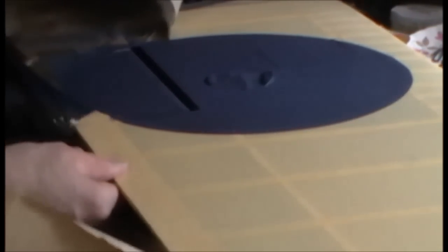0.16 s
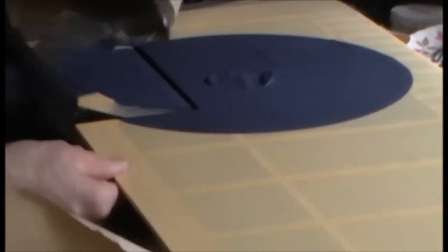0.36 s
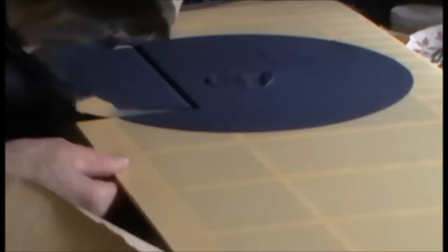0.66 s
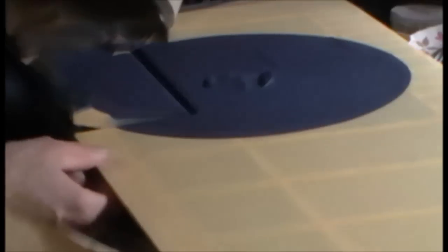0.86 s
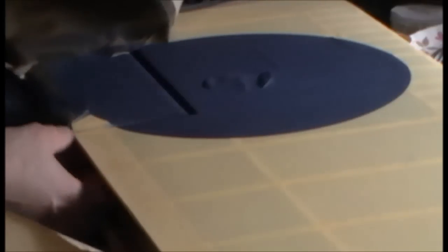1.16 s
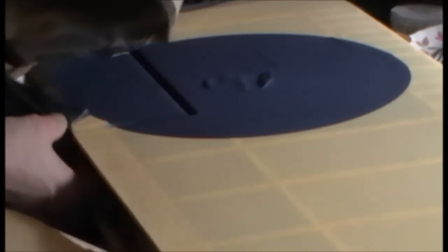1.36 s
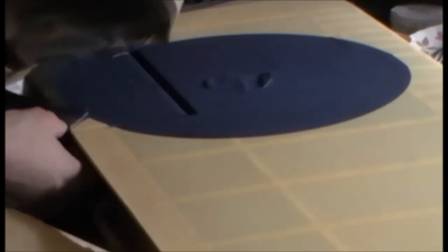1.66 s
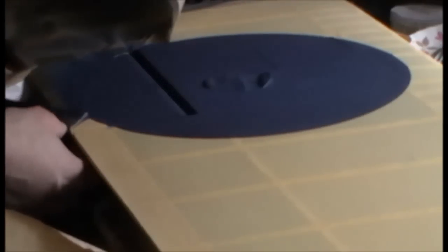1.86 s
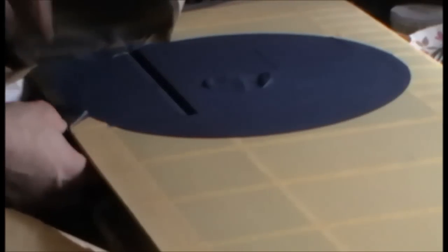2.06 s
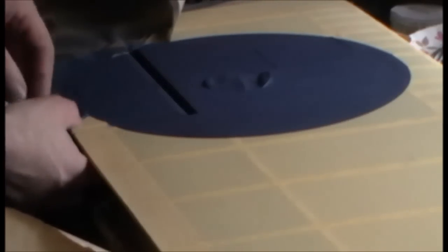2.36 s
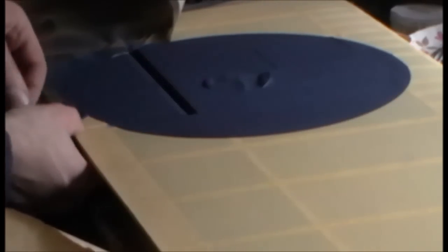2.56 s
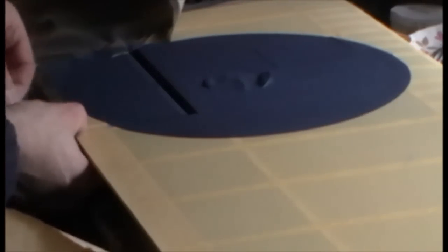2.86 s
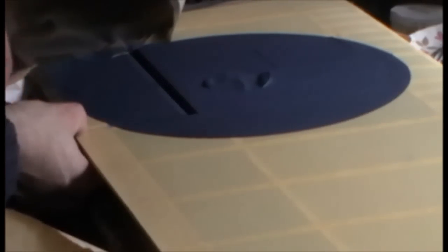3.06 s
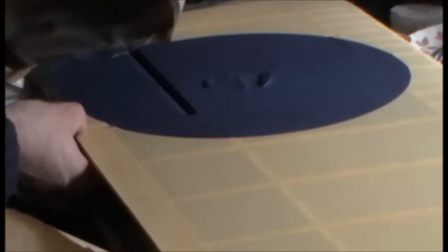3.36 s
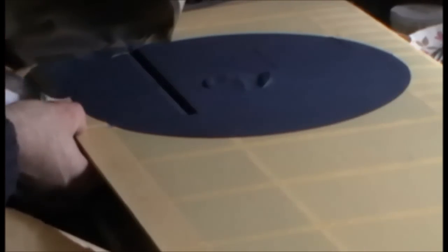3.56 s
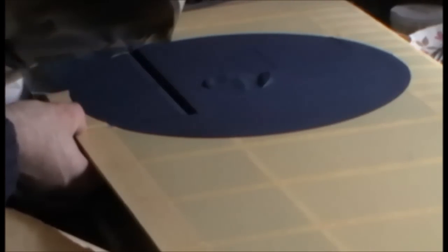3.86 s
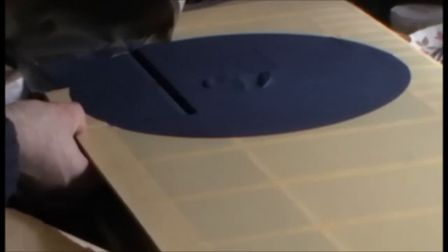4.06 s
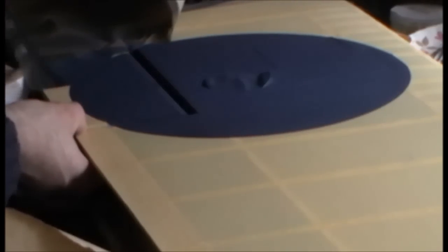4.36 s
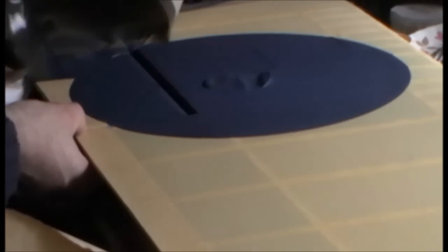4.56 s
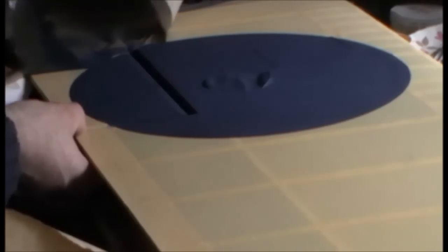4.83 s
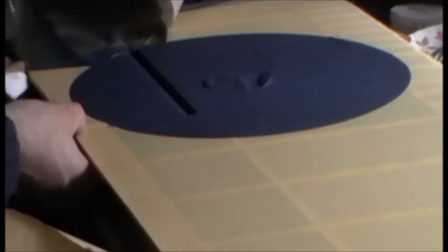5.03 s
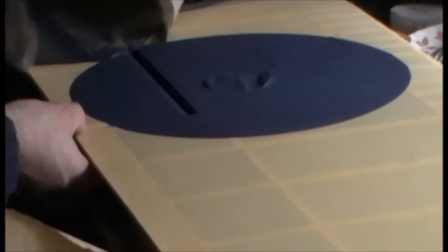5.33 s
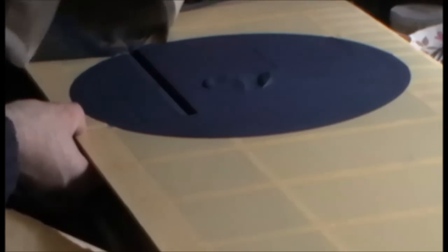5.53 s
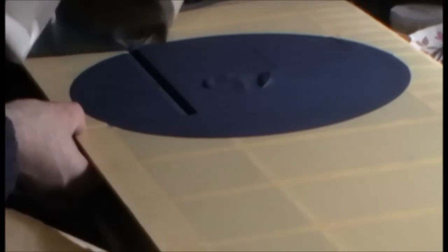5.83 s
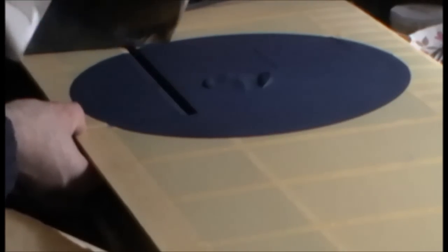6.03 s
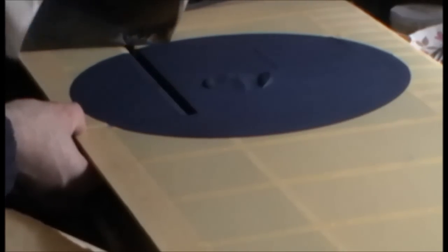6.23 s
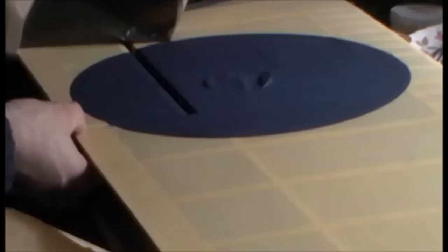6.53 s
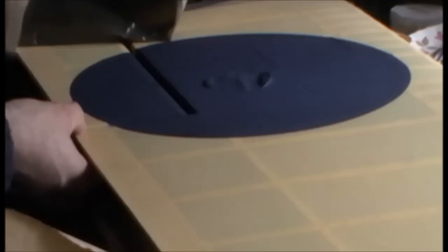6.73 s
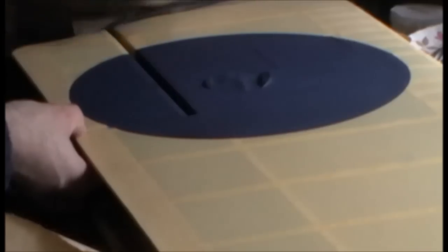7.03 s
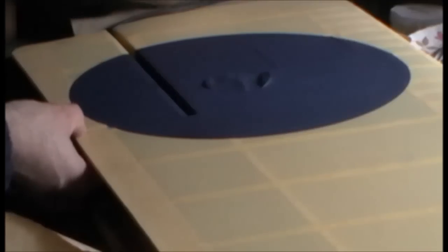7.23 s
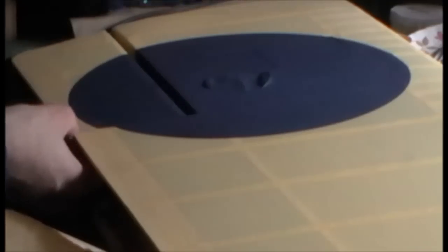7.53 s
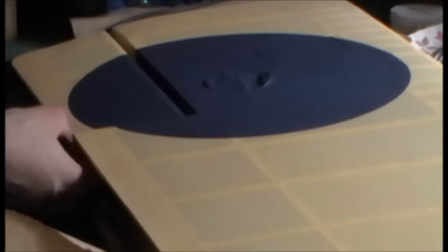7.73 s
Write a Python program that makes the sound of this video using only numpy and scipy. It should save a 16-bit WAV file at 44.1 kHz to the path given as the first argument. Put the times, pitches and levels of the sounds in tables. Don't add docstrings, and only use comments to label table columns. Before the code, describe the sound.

Close stereo pickup of sticky film coming off a stretched-skin wing: grainy rustle, brittle ticks, short ripping bursts and muted drumming of the frame. It starts busy, goes nearly quiet, returns in stronger pulls, and peaks near the end as the last strip tears free with a loud snap and low thump, then rustles out. Faint hum, hiss and distant traffic sit beneath.

```python
import sys
import numpy as np
from scipy import signal
from scipy.fft import rfft, irfft
from scipy.io import wavfile

SR = 44100
rng = np.random.default_rng(int(sys.argv[2]) if len(sys.argv) > 2 else 0)


def ratio_of_db(decibels):
    return 10 ** (np.asarray(decibels, float) / 20)


def unload_audio(sound):
    columns = np.transpose(np.atleast_2d(sound))
    steps = np.round(np.clip(columns, -1, 1) * 32767)
    wavfile.write(sys.argv[1], SR, steps.astype(np.int16))


N = 347949

# (frequency [Hz], level [dB per Hz])
FILM_COLOUR = [(410, -56), (700, 1), (830, -11), (1600, 1.5), (1970, 1.5), (2630, 0.5), (3890, 1.5),
               (4860, -0.5), (7010, -2), (16000, -35.5)]
# (frequency [Hz], width [Hz], level [dB])
SINGING_BAYS = [(1258, 240, -3.5), (2030, 99, -15.5), (2550, 230, -2.5), (3140, 320, -9.5),
                (4174, 120, -1.5), (5300, 230, -3)]


def at_hz(points, hz):
    points_hz, level_db = np.transpose(points)
    return np.interp(np.log(hz), np.log(points_hz), level_db)


def in_time(rows):
    s, *columns = np.transpose(rows)
    return [np.interp(np.arange(N) / SR, s, c) for c in columns]


def rms_one(x):
    return x / np.sqrt(np.mean(x ** 2) + 1e-20)


def drift(rate):
    steps = int(N / SR * rate * 2) + 2
    return np.interp(np.linspace(0, steps - 1, N), np.arange(steps), rng.standard_normal(steps)) * 1.2


def shaped(x, spectrum):
    hz = np.linspace(0, SR / 2, 257)
    taps = signal.firwin2(511, hz, ratio_of_db(2 * at_hz(spectrum, hz + 1)), fs=SR)
    return signal.fftconvolve(x, signal.minimum_phase(taps))[:len(x)]


def band(x, low_hz, high_hz, order=1):
    edges = [low_hz, min(high_hz, SR / 2.2)]
    return signal.sosfilt(signal.butter(order, edges, "band", fs=SR, output="sos"), x)


def steep(x, low_hz, high_hz):
    return band(x, low_hz, high_hz, order=2)


def hiss():
    # (frequency [Hz], level [dB per Hz])
    noise_colour = [(15, -62), (25, -17.5), (92, -5), (182, -10), (232, -13), (296, -10.5), (687, -11.5),
                    (952, -12.5), (1680, -20), (1980, -15), (2210, -19), (2400, -19.5), (2750, -25.5),
                    (15200, -38), (16500, -39)]
    # (frequency [Hz], likeness [0-1])
    likeness = [(60, 1), (180, 0.58), (550, 0.49), (1650, 0.36), (4970, 0.12), (15000, 0.79)]
    hz = np.fft.rfftfreq(N, 1 / SR) + 1
    alike = np.clip(at_hz(likeness, hz), 0, 1)
    mid, side = rfft(rng.standard_normal((2, N))) * ratio_of_db(at_hz(noise_colour, hz))
    mid, side = mid * np.sqrt(1 + alike), side * np.sqrt(1 - alike)
    return ratio_of_db(-56) * rms_one(irfft(np.array([mid + side, mid - side]), N))


def drones():
    # (time [s], pitch [Hz], level [dB])
    engines = [
        [(0.0, 70.8, -69), (1.26, 76.9, -74.5), (1.4, 93.6, -83), (1.93, 82, -71.5), (2.81, 90.0, -69.5),
         (3.37, 70.1, -73), (3.6, 78, -91)],
        [(3.6, 54.2, -78), (4.14, 49.3, -78), (4.48, 53.3, -63.5), (6.26, 53.5, -83), (7.55, 61.7, -80),
         (7.69, 49.2, -72), (7.89, 51.7, -90)],
    ]
    hum_hz, hum_db = 100, -80
    t = np.arange(N) / SR
    out = ratio_of_db(hum_db + 0.99 * drift(4)) * np.sin(2 * np.pi * hum_hz * t)
    for rows in engines:
        hz, level_db = in_time(rows)
        start, end = rows[0][0], rows[-1][0]
        heard = np.interp(t, [start - .2, start, end, end + 0.23], [0, 1, 1, 0])
        phase = 2 * np.pi * np.cumsum(hz + 1.95 * drift(2.6)) / SR
        out += heard * ratio_of_db(level_db + 10.5 + 1.2 * drift(10)) * np.sin(phase)
    return out


def slips(count, per_s, spread_db):
    chance, size, side = rng.random((3, count))
    return (chance < per_s / SR) * ratio_of_db(-spread_db * np.log(size + 0.03)) * np.sign(side - .5)


def wing(push, longest_s, scatter_db):
    # (frequency [Hz], level [dB], decay t60 [s])
    modes = [(366, -10.5, 0.06), (449, -10.5, 0.19), (564, -19.5, 0.15), (621, -15.5, 0.22), (699, -4, 0.1),
             (736, -12.5, 0.077), (788, -15.5, 0.24), (870, -19.5, 0.17), (936, -20.5, 0.17),
             (1009, -10.5, 0.15), (1144, -12.5, 0.11), (1458, -4, 0.04), (1558, -10.5, 0.09),
             (1640, -3, 0.029)]
    out = 0
    for k, (hz, level_db, t60) in enumerate(modes):
        t60 = min(t60, longest_s * min(800 / hz, 1))
        r, w = ratio_of_db(-60 / (t60 * SR)), 2 * np.pi * hz / SR
        gain = ratio_of_db(level_db + scatter_db * rng.standard_normal()) * np.sin(w)
        if 700 < hz < 1000 and k % 2:
            gain = -gain
        out = out + signal.lfilter([0, gain], [1, -2 * r * np.cos(w), r * r], push + 1e-18)
    return out


def crackle():
    pitches = np.geomspace(900, 9000, 12)
    pops, patch = np.abs(slips(N, 500, spread_db=2.5)), rng.integers(0, 12, N)
    fuzz = rng.standard_normal(N)
    fade = np.exp(-1 / (.004 * SR))
    out = 0
    for k, hz in enumerate(pitches):
        swell = signal.lfilter([1], [1, -fade], pops * (patch == k) + 1e-9)
        out = out + steep(fuzz * swell, hz / 2.0, hz * 1.42) * ratio_of_db(at_hz(FILM_COLOUR, hz))
    return rms_one(out)


def rustle():
    # (time [s], rustle level [dB], brightness [steps of 5 dB above about 4.5 kHz])
    pull = [(0, -63, 2), (.55, -73.5, 2.5), (1.0, -51.5, 0), (1.3, -64, 0), (1.65, -59, 1),
            (1.95, -67, 0.5), (3.35, -72.5, 2), (3.69, -65.5, 3), (4.1, -74.5, 2.5), (4.7, -44.5, 0),
            (4.95, -62, 2.5), (5.36, -48.5, 0.5), (6.08, -45.5, 0.5), (6.52, -61, -2), (6.72, -55, 1),
            (6.98, -42, 2.5), (7.3, -44, -1), (7.89, -52.5, -8)]
    film_db, bright_db = in_time(pull)
    wing_db = -54.5 + 0.76 * (film_db + 48.5)
    grains = slips(N, 6000 * ratio_of_db(3.0 * drift(30)), spread_db=2.5) * ratio_of_db(2.6 * drift(60))
    broad = shaped(grains, FILM_COLOUR)
    edges = np.geomspace(700, 16000, 9)
    patches = 0
    for k, (low, high) in enumerate(zip(edges, edges[1:])):
        patches = patches + ratio_of_db(1.8 * drift(16 + k)) * steep(broad, low, high)
    bays = sum(ratio_of_db(db) * rms_one(steep(broad, hz - w / 2, hz + w / 2)) for hz, w, db in SINGING_BAYS)
    film = rms_one(rms_one(patches) + 0.19 * bays)
    film = rms_one(film + .45 * crackle())
    film = film + (ratio_of_db(5 * bright_db) - 1) * (film - band(film, 100, 4500))
    push = slips(N, 1500, spread_db=3.5) * ratio_of_db(3.0 * drift(45))
    drum = rms_one(steep(push, 400, 2000) + .05 * wing(push, longest_s=.04, scatter_db=0))
    return ratio_of_db(film_db) * film + ratio_of_db(wing_db) * drum


def bumps():
    # (time [s], rms level [dB], pitch [Hz], half length [ms])
    knocks = [
        (.075, -53, 206, 260),
        (.39, -51.5, 255, 66),
        (0.606, -46.5, 600, 5.6),
        (.96, -51.5, 172, 34),
        (4.17, -57, 203, 14),
        (7.03, -42, 234, 45),
        (7.005, -50, 130, 37),
        (7.66, -55, 274, 160),
    ]
    t, shake = np.arange(N) / SR, rng.standard_normal(N)
    out = 0
    for s, db, hz, ms in knocks:
        swell = np.exp(-((t - s) * 1000 / ms) ** 2)
        out = out + ratio_of_db(db) * rms_one(steep(shake, hz / 1.04, hz * 1.77)) * swell
    return out


def film_and_wing(burst, hz, wing_db, treble_db):
    crack = steep(burst, hz / 1.4, hz * 1.4) + .6 * steep(burst, hz / 1.8, 9500)
    crack = crack + 0.09 * band(burst, hz / 1.04, hz * 1.04)
    treble = steep(burst, 9200, 13700)
    thud = steep(burst, 550, 2270)
    drum = thud + .025 * wing(thud, longest_s=.03, scatter_db=4)
    parts = [(crack, 0), (-treble, treble_db), (-drum, wing_db)]
    return sum(ratio_of_db(db) * part / np.abs(part).max() for part, db in parts)


def snap_rows():
    # (time [s], peak [dB], film pitch [Hz], wing share [dB], length [ms])
    tugs = [(1.8069, -20, 3400, -15.5, 8.7), (1.654, -32, 2480, -7.5, 5.7), (7.001, -10, 3180, -20, 6.1),
            (.948, -32.5, 6000, -6, 8), (6.937, -12, 6500, -21, 4.3), (0.0381, -24.5, 2740, -3, 49),
            (0.0631, -14.5, 6000, -4, 11.6), (0.1503, -12, 4730, -6.5, 6.3), (0.3374, -19, 6940, -8.5, 6.6),
            (0.317, -37, 1500, 5.5, 9.2), (0.3711, -26, 6000, -2, 3.7), (2.9738, -25.5, 2540, -33, 7),
            (3.3125, -27, 2350, -14, 8.5), (6.104, -16, 6400, -22, 4.4), (0.614, -20.5, 4330, -16, 3.8),
            (0.7449, -26.5, 2950, -17, 7.7), (0.9571, -25, 2920, -12, 7.1), (1.0440, -26.5, 5850, -24, 3.7),
            (1.308, -21.5, 3000, -12.5, 12.7), (1.7681, -30, 4330, -7, 9.8), (2.369, -35.5, 1520, -5, 10.6),
            (2.8767, -20, 3800, -4, 11.4), (4.151, -19.5, 4080, -15, 4.4), (4.401, -23.5, 6250, -10, 3.3),
            (4.8247, -27.5, 5020, -5, 6.4), (6.2034, -24.5, 3000, -5.5, 22),
            (6.8512, -12.5, 6300, -12.5, 3.5), (6.8859, -14.5, 7050, -17, 4),
            (6.979, -19, 6000, -10.5, 3.5), (6.9986, 0, 5500, -37, 4.7), (7.2716, -24.5, 4160, -10, 44),
            (7.333, -24, 2800, -3.5, 2.46), (7.4051, -22, 3270, -5.5, 4.6), (7.591, -24, 3630, -9, 8.2)]
    # (time [s], peak [dB], film pitch [Hz], length [ms])
    cracks = [(0.4617, -26.5, 6350, 9.2), (0.7273, -28, 6200, 13), (1.0099, -22, 6200, 4.9),
              (1.632, -24.5, 7100, 8.6), (1.652, -26.5, 4230, 11.2), (1.7979, -20, 6000, 6.2),
              (2.9734, -19.5, 7240, 11.4), (3.3132, -32.5, 4900, 3.4), (3.6588, -27, 7300, 7.7),
              (5.0936, -22.5, 4970, 6.6), (5.1635, -20.5, 5600, 8.1), (5.3228, -13.5, 2400, 2.3),
              (5.440, -15, 6300, 6.4), (5.459, -12.5, 6000, 5.35), (5.614, -14, 4440, 2.86),
              (5.6368, -12, 4730, 2.5), (5.698, -18.5, 5800, 4.2), (5.7513, -5, 6000, 3.1),
              (5.9036, -12, 6240, 7.5), (5.9677, -8, 6340, 5.5), (6.0631, -6.5, 4660, 2.3),
              (6.112, -23.5, 1490, 30), (6.283, -12, 7650, 4.8), (6.34, -14.5, 8000, 4.9),
              (6.448, -17.5, 6460, 3.9), (6.771, -16.5, 3720, 4.55), (6.824, -20, 6600, 44),
              (6.923, -5, 6170, 4.9), (7.076, -28, 3700, 4), (7.568, -21, 5530, 6.6)]
    # (time [s], peak [dB], film pitch [Hz])
    ticks = [(.189, -30, 6480), (.203, -33.5, 6500), (0.2705, -37, 8000), (.638, -34.5, 7000),
             (.6988, -50, 3500), (4.3415, -37, 5000), (4.543, -35, 5000), (4.692, -29, 4000),
             (5.174, -25, 7500), (5.40, -36, 4500), (6.145, -28, 6500), (6.168, -31, 6000),
             (6.672, -44, 4500), (6.696, -41, 6000), (6.733, -31, 6000), (0.5233, -34.5, 5650),
             (0.7148, -35, 5880), (0.7938, -40, 1650), (1.174, -35, 2630), (1.6132, -34.5, 3800),
             (2.206, -30, 6200), (2.504, -42, 2370), (2.9458, -31.5, 4230), (3.034, -39, 7500),
             (3.4297, -34.5, 3870), (3.6032, -33.5, 5700), (3.7992, -32.5, 2550), (4.314, -38, 5800),
             (4.369, -31.5, 3280), (4.6587, -27.5, 2700), (4.889, -36, 3200), (4.9154, -27, 7000),
             (4.942, -26.5, 5750), (4.9606, -25.5, 6200), (5.2114, -26.5, 2550), (5.2893, -25.5, 4700),
             (5.7269, -32, 7500), (5.845, -23.5, 4870), (5.8731, -27, 1720), (6.4337, -24, 5650),
             (6.6258, -36, 4450), (6.7433, -26, 4400), (7.4265, -27, 1580), (7.5357, -26.5, 6840),
             (7.8148, -26, 3360)]
    # (time [s], peak [dB], film pitch [Hz])
    short_ticks = [(1.0005, -36, 7500), (1.057, -30, 6000), (1.072, -45, 8000), (1.088, -46, 8000),
                   (1.21, -44, 5000), (1.247, -46, 4000), (1.7345, -48, 4500), (1.758, -39, 4500),
                   (1.847, -32, 6500), (1.509, -38, 3000), (3.92, -44, 4000), (4.19, -38, 5000),
                   (7.621, -35, 3000), (7.6634, -36, 3000), (6.987, -22, 5000), (6.909, -20, 6500),
                   (0.254, -36.5, 4080), (0.827, -38, 5000), (0.881, -35, 2030), (1.085, -34, 1480),
                   (1.151, -39, 2550), (1.302, -40, 2600), (3.487, -38, 4160), (3.617, -33, 1640),
                   (3.778, -39, 3500), (3.835, -36, 2840), (3.8606, -38, 2630), (4.388, -30, 6000),
                   (4.997, -31, 4100), (5.2653, -35, 2380), (6.601, -38, 4470), (1.908, -38, 3020),
                   (2.158, -40, 3240), (5.956, -23, 6095), (6.084, -21, 6540), (6.897, -16.5, 7000)]
    rows = [(s, db, hz, wing_db, -22, ms) for s, db, hz, wing_db, ms in tugs]
    rows += [(s, db, hz, -41.5 - db, -38, ms) for s, db, hz, ms in cracks]
    rows += [(s, db, hz, -13.5, -37, 7.9) for s, db, hz in ticks]
    rows += [(s, db, hz, -17.5, -35, 6.2) for s, db, hz in short_ticks]
    return rows


def snaps():
    film = np.zeros(N + SR)
    for s, peak_db, hz, wing_db, treble_db, length_ms in snap_rows():
        peak_db = min(peak_db, -5)
        wing_db = min(wing_db, -13 - peak_db)
        treble_db += 19 * np.log2(hz / 5000)
        t = np.arange(0, min(.04 + .006 * length_ms, .125), 1 / SR)
        steps = np.repeat(ratio_of_db(2.1 * rng.standard_normal(len(t) // 48 + 1)), 48)[:len(t)]
        burst = slips(len(t), per_s=7000, spread_db=3.5) * steps
        burst *= np.exp(-t / (max(length_ms, .5) / 1000)) * np.minimum(0.2 + t / 0.0011, 1)
        main_slip = round(rng.uniform(.0008, .003) * SR)
        burst[main_slip] += 2.5 * np.abs(burst).max() * min(4 / length_ms, 1)
        at = round(s * SR)
        film[at:at + len(t)] += ratio_of_db(peak_db - 0.41) * film_and_wing(burst, hz, wing_db - .1, treble_db)
    return film[:N]


def rips():
    # (time of the top [s], rms level [dB], film pitch [Hz], wing share [dB], half length [ms])
    stretches = [(0.059, -27.5, 5300, -14, 21), (.19, -37.5, 5670, -3, 19), (0.328, -42.5, 2500, -2, 47),
                 (0.377, -31.5, 3330, -4, 37), (0.741, -37, 4470, -25, 13), (0.965, -38, 3530, -9, 12),
                 (1.08, -49.5, 3000, 1, 29), (1.59, -46, 5000, -6.5, 16), (1.682, -45, 5000, -12, 11),
                 (1.82, -33, 4350, -5.5, 12.3), (1.879, -44, 3000, -2.5, 17), (3.46, -49, 4500, -8, 24),
                 (3.81, -44, 3020, -17, 15), (3.681, -39, 6460, -31, 28), (4.335, -42, 4500, -20, 31),
                 (4.402, -28.5, 6000, -33, 11), (4.429, -34, 2550, -16, 31), (4.61, -40, 3620, -27, 36),
                 (4.71, -33, 3080, -26, 28), (4.775, -45, 3280, -12, 17), (4.896, -40.5, 3000, -7.5, 17),
                 (5.015, -46, 4000, -12, 12), (5.18, -32, 5100, -6.5, 16), (5.33, -28, 4100, -17, 21),
                 (5.459, -36.5, 6400, -4, 7.4), (6.132, -35, 4100, -3.5, 42), (6.212, -33, 4300, -14, 27),
                 (6.305, -33, 5960, -20, 10), (6.39, -38.5, 4430, -7, 51), (6.47, -42, 5500, -10, 17),
                 (6.905, -25.5, 2480, -4.5, 13), (6.93, -17.5, 5530, -7, 18), (6.993, -22.5, 5030, 1.5, 7),
                 (7.02, -23.5, 4170, -7, 28), (7.08, -18, 4460, -11, 6.5), (7.097, -14.5, 5000, -14, 13),
                 (7.207, -30, 5000, -39, 51), (7.34, -38, 2550, -1, 24), (7.491, -36.5, 4070, -9.5, 24),
                 (7.668, -40, 3080, 0.5, 25)]
    film, t = np.zeros(N + SR), np.arange(-SR // 8, SR // 8) / SR
    for s, level_db, hz, wing_db, half_ms in stretches:
        uneven = np.repeat(ratio_of_db(1.8 * rng.standard_normal(len(t) // 128 + 1)), 128)[:len(t)]
        swell = np.exp(-(t * 1000 / half_ms) ** 2)
        burst = slips(len(t), per_s=7000, spread_db=2.0) * uneven * swell
        at = round(s * SR)
        film[at:at + len(t)] += ratio_of_db(level_db + 4.0) * film_and_wing(burst, hz, wing_db, treble_db=-29)
    film = film[SR // 8:SR // 8 + N]
    bays = sum(3 * ratio_of_db(db) * steep(film, hz - w / 2, hz + w / 2) for hz, w, db in SINGING_BAYS)
    return film + 0.15 * bays


def boom():
    # (time [s], peak level [dB])
    last_tear = [
        (7.0008, -1),
    ]
    (s, peak_db), = last_tear
    t = np.arange(SR // 2) / SR
    pluck = t == 0
    push = .035 * slips(len(t), 3000, spread_db=2.0) * np.exp(-t / .012) + pluck
    ringing = wing(push, longest_s=.18, scatter_db=0)
    late_lows = ringing - band(ringing, 300, 520) * np.exp(-(t / .004) ** 2)
    ringing = steep(late_lows, 310, 2800)
    ringing *= (1 - np.exp(-t / .0005)) * np.exp(-(t / .085) ** 2)
    ringing = steep(ringing, 270, 5000)
    out = np.zeros(N)
    out[round(s * SR):][:len(t)] = ratio_of_db(peak_db) * ringing / np.abs(ringing).max()
    return out


def echoes():
    t60_s, side_db = 0.13, -12.5
    t = np.arange(SR // 3) / SR
    mid, side, shade = rng.standard_normal((3, len(t))) * ratio_of_db(-60 * t / t60_s)
    mid = band(mid * (t > .003), 158, 2460)
    side = band(side * (t > .003), 420, 3700) * ratio_of_db(side_db)
    side += steep(shade * (t < .002), 9900, 15100)
    return np.array([mid + side, mid - side]) / np.sqrt(np.sum(mid ** 2))


def room(x):
    turn = np.arange(N) / SR / .03 % 4
    out = 0
    for k in range(4):
        share = np.clip(1 - np.abs((turn - k + 2) % 4 - 2), 0, 1) ** .5
        out = out + signal.oaconvolve((x * share)[None], echoes(), axes=1)[:, :N]
    return ratio_of_db(-9.5) * out


def scene():
    peel, thump = snaps() + rips() + rustle() + bumps(), boom()
    peel = signal.sosfilt(signal.butter(2, 11940, fs=SR, output="sos"), peel)
    return peel + thump + room(peel + .5 * thump) + hiss() + drones()


def roll_off(x):
    return signal.sosfilt(signal.butter(12, 16810, fs=SR, output="sos"), x)


def record(dry):
    edge = signal.cheby2(8, 20, 15900, fs=SR, output="sos")
    mix = signal.sosfilt(edge, np.clip(dry, -1, 1))
    return roll_off(mix)


dry = scene()
out = record(dry)
unload_audio(out)
```